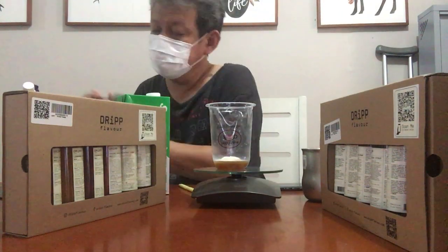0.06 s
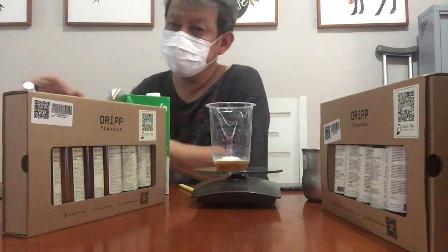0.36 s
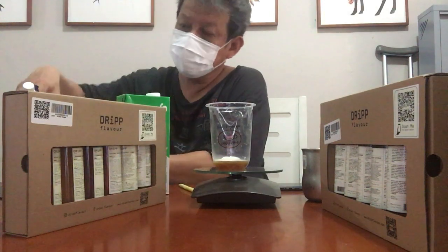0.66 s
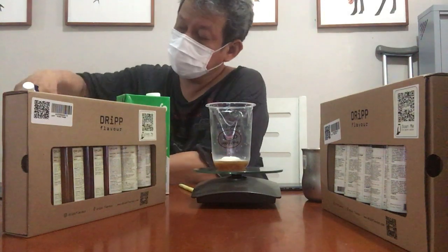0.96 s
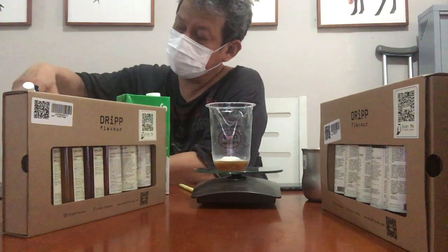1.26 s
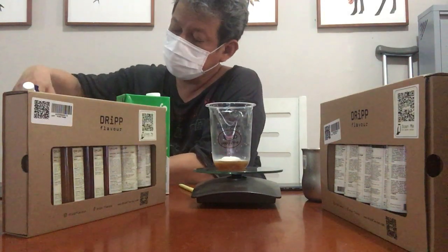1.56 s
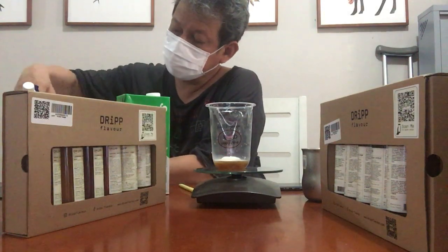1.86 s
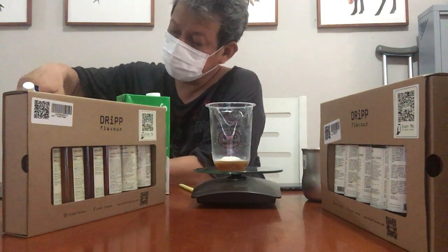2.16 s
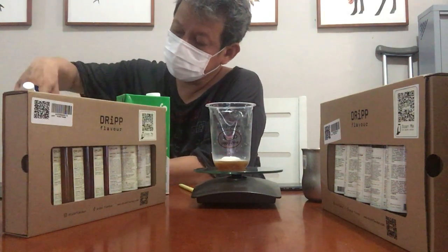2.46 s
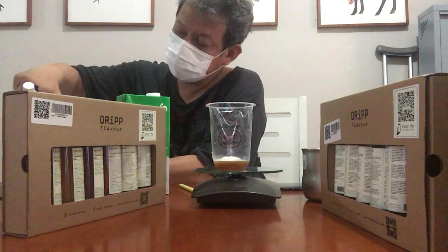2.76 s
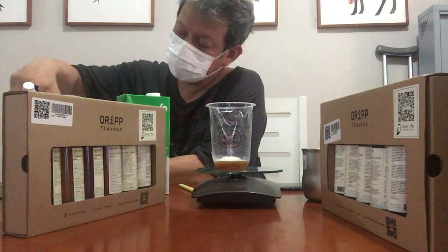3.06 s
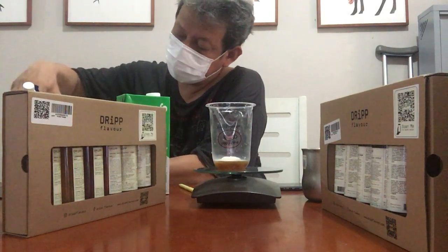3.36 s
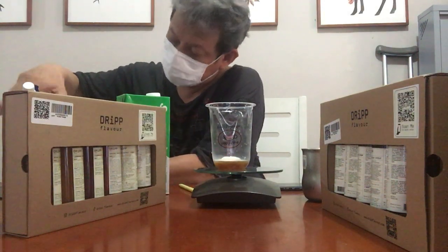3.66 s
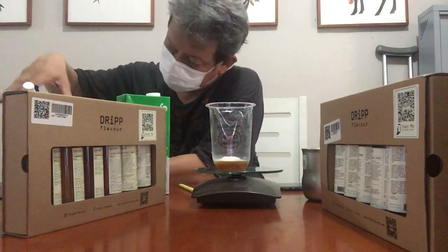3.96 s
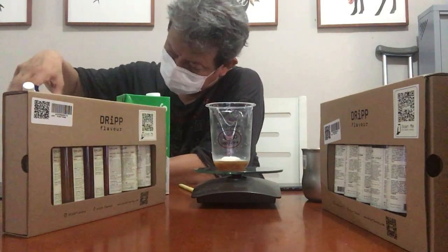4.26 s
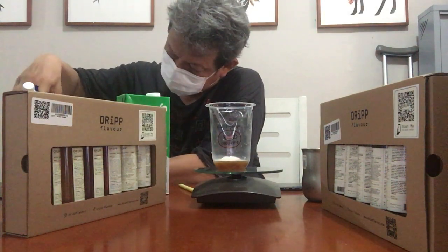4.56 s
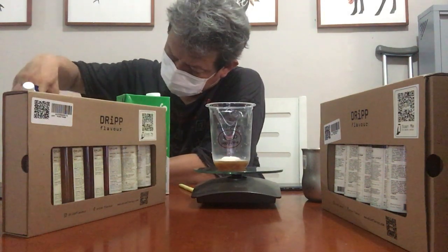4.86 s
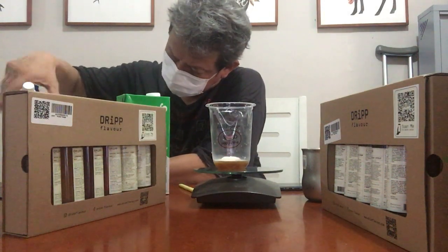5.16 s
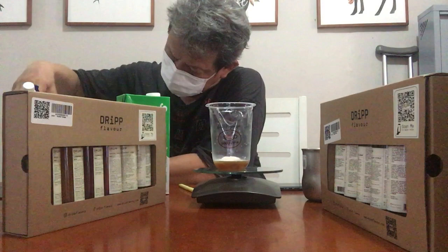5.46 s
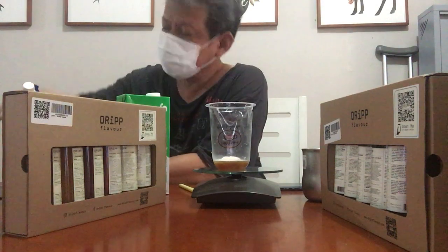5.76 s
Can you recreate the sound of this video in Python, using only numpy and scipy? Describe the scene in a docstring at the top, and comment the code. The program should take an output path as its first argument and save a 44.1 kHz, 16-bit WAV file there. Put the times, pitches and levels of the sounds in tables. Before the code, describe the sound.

In a small bare room, a metal spoon is picked up from a wooden table with a few light knocks and two clinks. It then digs again and again into a small container of something grainy, each dig a dull tap with a click and a brief crunch. The table booms softly underneath, while an arm bumps and a sleeve slides over it. A faint steady hiss lies behind.

```python
"""Spoon digging in a grainy container

A metal spoon is picked up from a wooden table and clinks twice, then digs again and again into a
small container of something grainy. Each dig knocks the container, a thump with a click on top, and
crunches as grains slip past. The table booms low after knocks; arms bump and slide on it softly.
The room is small and bare, with a faint steady hiss."""
import sys
import numpy as np
from scipy import signal
from scipy.fft import rfft, irfft
from scipy.io import wavfile
from scipy.ndimage import uniform_filter1d

SR = 44100
rng = np.random.default_rng(int(sys.argv[2]) if len(sys.argv) > 2 else 0)


def digitize_waveform(pressure):
    """Quantize a signal to 16-bit integers and store it at the path in sys.argv[1].

    Rows of a 2-D input are taken as channels; values are limited to [-1, 1].
    """
    field = np.atleast_2d(pressure).T
    bounded = np.clip(field, -1, 1)
    quanta = np.round(bounded * 32767).astype(np.int16)
    wavfile.write(sys.argv[1], SR, quanta)


N = 256220
TIME = np.arange(N) / SR
AGE = TIME[:SR // 2]   # seconds since a hit

# The spoon knocks the container. Each row: start in seconds, relative body level in dB,
# thump pitch in Hz, relative click level in dB.
KNOCK_HITS = [(0.582, -38, 353, -52.5), (0.785, -46.5, 267, -62), (0.828, -45, 251, -79),
              (0.964, -41, 270, -65), (1.004, -40, 313, -66), (1.021, -38, 290, -62),
              (1.063, -42.5, 530, -80), (2.18, -40, 234, -54.5), (2.206, -40, 370, -63),
              (2.2601, -33, 366, -47), (2.302, -39.5, 330, -56), (2.3309, -35.5, 330, -51.5),
              (2.718, -47.5, 354, -66), (2.789, -38.5, 314, -64), (3.137, -44, 300, -58),
              (3.485, -41.5, 272, -73), (3.4944, -39, 343, -47.5), (3.526, -41, 398, -77),
              (3.578, -45, 300, -67), (3.6225, -51, 368, -55.5), (3.638, -64, 316, -53),
              (3.7914, -33, 302, -39), (3.8548, -35, 400, -43.5), (4.1509, -33, 310, -49.5),
              (4.157, -41, 317, -67), (4.2052, -42, 320, -50), (4.2333, -38, 406, -46),
              (4.282, -28, 362, -53), (4.482, -46, 300, -71), (4.546, -45, 295, -65),
              (4.586, -43.5, 382, -60.5), (4.6243, -40, 380, -49), (4.899, -37, 254, -50.5),
              (5.0209, -38.5, 330, -49.5), (5.0546, -36, 350, -46), (5.081, -34.5, 398, -59),
              (5.358, -46.5, 294, -67), (5.521, -46.5, 340, -62), (5.691, -47, 277, -67),
              (5.7213, -39.5, 344, -58)]
# A knock's dull thud. Each row: multiple of the thump pitch, level in dB.
THUD_SPECTRUM = [(.3, -13), (.6, -1), (1.15, 0), (1.8, -3), (2.4, -14.5), (3.6, -40.5), (7, -33), (40, -56)]
# Digging strokes. Each row: hardest moment in seconds, rise in seconds, relative crunch level in dB,
# relative rumble level in dB.
DIG_STROKES = [(0.809, 0.04, -62, -66), (2.309, 0.077, -52.5, -39), (2.849, 0.12, -63, -49.5),
               (3.142, 0.034, -59, -41), (3.507, 0.045, -59.5, -40.5), (3.646, 0.063, -72, -41.5),
               (3.81, 0.06, -67, -45.5), (3.883, 0.048, -50, -37), (4.238, 0.09, -50.5, -37.5),
               (4.624, 0.058, -62, -41), (5.064, 0.11, -53.5, -35.5)]
# The spoon strikes something hard. Each row: start in seconds, clang level in dB, ring level in dB,
# favoured pitch in Hz.
CLINK_HITS = [(1.0045, -32.5, -30.5, 4130), (1.0144, -37, -43, 2600), (1.0216, -44, -51, 6000),
              (1.4993, -44, -49.5, 8900)]
# Soft arm bumps, and the table booming low after spoon knocks.
# Each row: start in seconds, relative level in dB, pitch in Hz.
LOW_THUMPS = [(0.259, -40.5, 184), (0.633, -50.5, 129), (1.007, -48.5, 188), (1.029, -50, 112),
              (1.329, -59, 206), (2.214, -48.5, 126), (2.459, -44, 193), (2.85, -45.5, 170),
              (3.098, -48.5, 167), (3.441, -48.5, 107), (3.787, -40.5, 170), (4.292, -46, 106),
              (4.601, -52.5, 112), (4.783, -55.5, 176), (4.986, -37, 242), (5.033, -35.5, 266),
              (5.379, -62, 178), (5.762, -53, 207)]
# A sleeve slides over the table. Each row: start in seconds, length in seconds, level in dB.
SLEEVE_SLIDES = [(0.224, 0.26, -53.5), (2.43, 0.32, -54), (4.76, 0.49, -56)]
# Resonances of the container wall, the spoon, and the table with the room.
# Each row: pitch in Hz, relative level in dB, time to fade by 60 dB in seconds.
WALL_MODES = [(952, -23, 0.056), (1218, -10, 0.031), (1420, -10, 0.0054), (2080, 1, 0.015),
              (2270, 0.5, 0.0067), (2720, -4, 0.0034)]
SPOON_MODES = [(2080, 3, 0.08), (2166, 7, 0.06), (2270, 2, .04), (2950, -9, .03), (4485, -1, 0.05),
               (5516, 0, .05), (5612, 1, 0.07), (5770, 1, 0.035), (6170, 0, .035), (6310, 2, 0.04),
               (7430, -6, .04), (7620, -8, .06), (7788, -11, 0.07), (8215, -7, 0.16), (8450, -12, 0.09),
               (10340, -8, 0.15), (11800, -17, 0.05), (15020, -17, .06)]
BOOM_MODES = [(56.2, -11, 0.52), (115.1, -8, 0.33), (204.8, -8, 0.23), (251.6, -20, 0.17),
              (332.7, -17.5, 0.3), (378, -9.5, 0.12), (546, -14, 0.25), (670, -6.5, 0.055)]
# EQ curves of the noise layers. Each row: frequency in Hz, relative level in dB.
TICK_EQ = [(1200, -7.5), (3000, -10.5), (4700, -3), (6200, -9.5), (8400, -7.5), (10800, -17.5),
           (13200, -26), (15500, -39)]   # spoon on the container
CRUNCH_EQ = [(700, -13), (1150, 5), (1550, -0.5), (2150, 2.5), (3000, -10), (5000, -1), (7000, -4),
             (9000, -1), (10500, -16), (12500, -14), (15000, -27)]   # slipping grains
RUMBLE_EQ = [(60, -31.5), (120, -6), (200, 1.5), (350, 4.5), (480, -3), (650, -1.5), (900, -26.5),
             (1600, -39.5), (12000, -51)]   # container shaken by the grains
CLANG_EQ = [(700, -17), (1500, -10.5), (2150, -3), (2800, 1), (3600, -5), (4600, -2.5), (6000, 2.5),
            (8500, -8.5), (12000, -15.5), (15000, -35)]   # steel on a hard edge
RUB_EQ = [(35, -15), (60, 6.5), (115, 2), (220, 3), (370, -6.5), (600, -12.5), (900, -33.5), (1800, -30),
          (12000, -56)]   # arm on wood
SLEEVE_EQ = [(60, -3.5), (120, -9.5), (210, 3.5), (330, -4), (500, -20.5), (900, -17.5), (1400, -22.5),
             (2500, -29.5), (5500, -32), (9000, -46), (14000, -64)]   # cloth on wood
HISS_EQ = [(25, -27.5), (60, -11.5), (110, 1.5), (200, -7), (400, -16.5), (700, -13), (1500, -17.5),
           (3500, -22.5), (5200, -22.5), (8500, -25.5), (12000, -29.5), (15500, -38)]   # steady background
# The room's reverb. Each row: frequency in Hz, time to fade by 60 dB in seconds, relative level in dB.
REVERB_BANDS = [(57, 0.98, 2.5), (294, 0.36, 0.5), (1050, 0.47, 1.5), (2980, 0.44, 1.5), (7250, 0.45, 0.5),
                (14000, 0.42, 3.5)]


def knocks(average_contact_s=0.0029, softening_db=39, body_lag_s=0.00069):
    """Spoon on container: a pitched thump in a dull thud, under a click. Returns bodies and clicks."""
    bodies, clicks = np.zeros(N), np.zeros(N)
    average_click_db = np.mean([click_db for _, _, _, click_db in KNOCK_HITS])
    for start, body_db, hz, click_db in KNOCK_HITS:
        # a faint click means a soft contact, so a slower attack
        contact_s = average_contact_s * 2 ** ((average_click_db - click_db) / softening_db)
        thud_eq = [(multiple * hz, db) for multiple, db in THUD_SPECTRUM]
        thud = peak_one(burst(thud_eq, t60=0.032) * attack(contact_s))
        body = from_db(-3.5) * thump(hz, cycles=4.0, rise_s=contact_s) + from_db(-7) * thud
        wall = peak_one(ring(WALL_MODES, scatter_db=1.0))
        click = from_db(-3.5) * wall + from_db(-2.5) * burst(TICK_EQ, t60=0.011)
        add(bodies, start + body_lag_s, from_db(body_db) * body)   # the heavy body answers late
        add(clicks, start, from_db(click_db) * click)
    return bodies, clicks


def digs(grains_per_s=800, spread_db=4.5, release_s=0.047, crunch_trim_db=-4.5, rumble_trim_db=-6):
    """Grains slip past the spoon and shake the container. Returns rumble and crunch."""
    crunch_gain, rumble_gain = np.zeros(N), np.zeros(N)
    for top, rise, crunch_db, rumble_db in DIG_STROKES:
        effort = swell(top - rise, top, top + release_s, edge_db=-13.0)
        crunch_gain += effort * from_db(crunch_db + crunch_trim_db)
        rumble_gain += effort ** 2 * from_db(rumble_db + rumble_trim_db)   # it takes a hard push
    sizes = from_db(spread_db * np.minimum(rng.exponential(1, N), 3))
    signs = rng.choice([-1, 1], N)
    slips = sizes * signs * (rng.random(N) < grains_per_s / SR)
    rumble = rumble_gain * rms_one(colour(slips, RUMBLE_EQ))
    crunch = crunch_gain * rms_one(colour(slips, CRUNCH_EQ))
    return rumble, crunch


def clinks(falloff_db_per_octave=8):
    """Steel on a hard edge: a short clang and a ring, weaker away from the pitch the touch favours."""
    out = np.zeros(N)
    for start, clang_db, ring_db, favoured_hz in CLINK_HITS:
        modes = [(hz, db - falloff_db_per_octave * abs(np.log2(hz / favoured_hz)), t60)
                 for hz, db, t60 in SPOON_MODES]
        add(out, start, from_db(ring_db) * peak_one(ring(modes, scatter_db=6.5)))
        add(out, start, from_db(clang_db) * burst(CLANG_EQ, t60=0.019))
    return out


def low_thumps(trim_db=-2):
    """The table swings slowly after a soft arm bump or a spoon knock: round thumps with no click."""
    out = np.zeros(N)
    for start, db, hz in LOW_THUMPS:
        add(out, start, from_db(db + trim_db) * thump(hz, cycles=5.65, rise_s=0.011))
    return out


def arm_rub(resting_db=-65.5, rub_db=-59, thump_share=0.47, rise_s=0.0053, t60=0.58):
    """An arm rubs dully on the table top, louder at each low thump and never lying quite still."""
    motion = np.full(N, from_db(resting_db))
    average_db = np.mean([db for _, db, _ in LOW_THUMPS])
    for start, thump_db, _ in LOW_THUMPS:
        level_db = rub_db + thump_share * (thump_db - average_db)
        add(motion, start, from_db(level_db - 60 * TIME / t60) * attack(rise_s, TIME))
    return motion * noise(RUB_EQ)


def sleeve_slides(rise_s=0.04):
    """Cloth brushes over the wood, quickly up to speed and then easing off."""
    speed = sum(from_db(db) * swell(start, start + rise_s, start + length, edge_db=-8)
                for start, length, db in SLEEVE_SLIDES)
    return speed * noise(SLEEVE_EQ)


def table_boom(x, coupling_db=-40):
    """Low sounds set the table and the room's standing waves booming."""
    boom = sum(from_db(db - 60 * AGE / t60) * np.cos(2 * np.pi * hz * AGE) for hz, db, t60 in BOOM_MODES)
    return x + from_db(coupling_db) * convolve(x, boom)


def room(x, wet_db, evenness, predelay_s=0.0043, smoothing_hz=90):
    """Dense wall echoes follow a short gap and die band by band; evenness 0-1 is how diffuse they are."""
    tail, edges_hz = np.zeros(len(AGE)), np.geomspace(45, 17000, 17)
    arrived = AGE > predelay_s
    for low, high in zip(edges_hz, edges_hz[1:]):
        hz = np.sqrt(low * high)
        bandpass = signal.butter(2, [low, high], "band", fs=SR, output="sos")
        band = signal.sosfilt(bandpass, rng.standard_normal(len(AGE)) * arrived)
        band *= from_db(-60 * AGE / at_hz(REVERB_BANDS, hz))
        unity_gain = np.sqrt(2 * (high - low) / SR / np.sum(band ** 2))
        tail += band * unity_gain * from_db(at_hz(REVERB_BANDS, hz, column=2))
    # in a diffuse tail no single frequency stands far above its neighbours
    spectrum = rfft(tail, SR)
    power = np.abs(spectrum) ** 2 + 1e-9
    spectrum *= (uniform_filter1d(power, smoothing_hz) / power) ** (evenness / 2)
    diffuse_tail = irfft(spectrum)[:len(AGE)] * arrived
    return x + from_db(wet_db) * convolve(x, diffuse_tail)


def hiss(level_db=-68.5):
    """A faint, steady bed of noise."""
    return from_db(level_db) * noise(HISS_EQ)


def thump(hz, cycles, rise_s):
    """A damped swing that builds over the contact time and loses 60 dB in the given cycles."""
    return peak_one(np.sin(2 * np.pi * hz * AGE) * from_db(-60 * AGE * hz / cycles) * attack(rise_s))


def ring(modes, scatter_db):
    """Decaying sines; each blow shares its strength out a little differently."""
    out = np.zeros(len(AGE))
    for k, (hz, db, t60) in enumerate(modes):
        envelope = from_db(db + scatter_db * rng.normal() - 60 * AGE / t60)
        out += (-1) ** k * envelope * np.sin(2 * np.pi * hz * AGE)
    return out


def burst(eq, t60):
    """The many heavily damped modes of a contact: noise that dies at once."""
    return peak_one(colour(rng.standard_normal(len(AGE)) * from_db(-60 * AGE / t60), eq))


def noise(eq):
    """Steady coloured noise at rms 1."""
    return rms_one(colour(rng.standard_normal(N), eq))


def swell(start, top, end, edge_db, fade_s=0.0085):
    """A stroke's envelope: up from edge_db to its hardest moment and back, faded at both ends."""
    gate = np.clip(np.minimum(TIME - start, end - TIME) / fade_s, 0, 1)
    return gate * from_db(np.interp(TIME, [start, top, end], [edge_db, 0, edge_db]))


def attack(rise_s, age=AGE):
    """A rounded onset from 0 towards 1."""
    return 1 - np.exp(-age / rise_s)


def colour(x, eq, size=4096):
    """Minimum-phase EQ, so nothing rings ahead of a hit."""
    hz = np.maximum(np.fft.rfftfreq(size, 1 / SR), 1)
    cepstrum = irfft(np.log(from_db(at_hz(eq, hz))))
    cepstrum[1:size // 2] *= 2
    cepstrum[size // 2 + 1:] = 0
    return convolve(x, irfft(np.exp(rfft(cepstrum))))


def convolve(x, response):
    """Pass a signal through a response, keeping its length."""
    return signal.fftconvolve(x, response)[:len(x)]


def at_hz(rows, hz, column=1):
    """Read one column of a table on a log-frequency axis."""
    table = np.array(rows)
    return np.interp(np.log(hz), np.log(table[:, 0]), table[:, column])


def add(out, start_s, sound):
    """Mix a sound in at its cue."""
    start = round(start_s * SR)
    out[start:start + len(sound)] += sound[:N - start]


def from_db(db):
    """Decibels to gain."""
    return 10 ** (np.asarray(db) / 20)


def rms_one(x):
    """Scale to rms 1."""
    return x / np.sqrt(np.mean(x ** 2) + 1e-20)


def peak_one(x, size=176):
    """Scale so that the loudest few milliseconds have rms 1."""
    return x / np.sqrt(uniform_filter1d(x ** 2, size, mode="constant").max())


def scene():
    """The mono mix: hits and digs in the room, over dry rubbing and hiss."""
    bodies, clicks = knocks()
    rumble, crunch = digs()
    low = room(table_boom(bodies + low_thumps() + rumble), wet_db=-5.0, evenness=0.62)
    bright = room(clicks + crunch, wet_db=1.5, evenness=0.51)
    steel = room(clinks(), wet_db=0.5, evenness=0.64)
    bed = hiss() + arm_rub() + sleeve_slides()
    return (low + bright + steel + bed)[None]


def record(dry, low_cut_hz=44, rolloff_hz=13200, high_cut_hz=15600):
    """The microphone loses the deepest bass and rolls off in the high treble; the top is cut steeply."""
    thin = signal.sosfilt(signal.butter(4, low_cut_hz, "high", fs=SR, output="sos"), dry)
    soft = signal.sosfilt(signal.butter(3, rolloff_hz, fs=SR, output="sos"), thin)
    return signal.sosfilt(signal.ellip(10, .1, 70, high_cut_hz, fs=SR, output="sos"), soft)


dry = scene()
out = record(dry)
digitize_waveform(out)
```